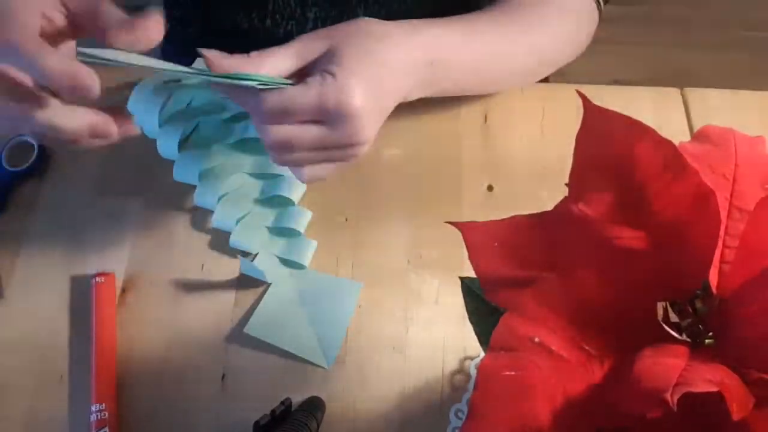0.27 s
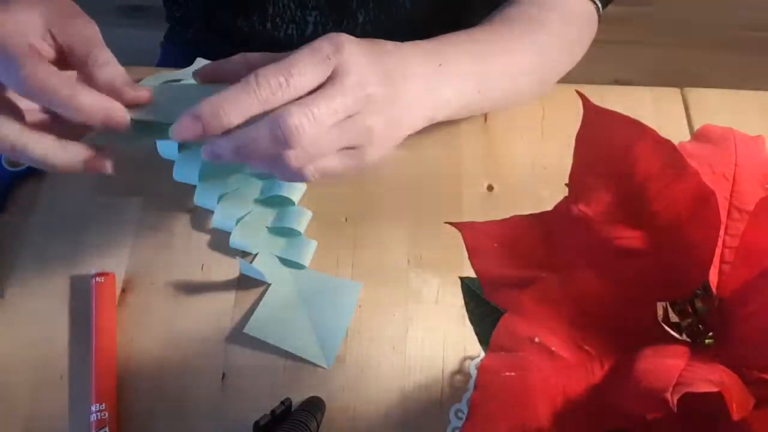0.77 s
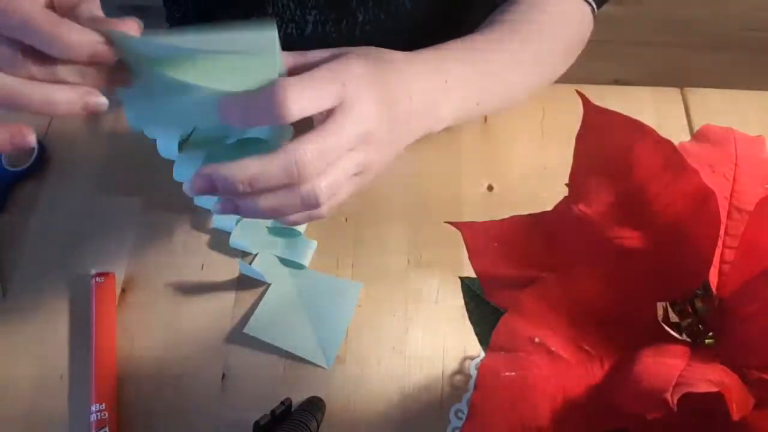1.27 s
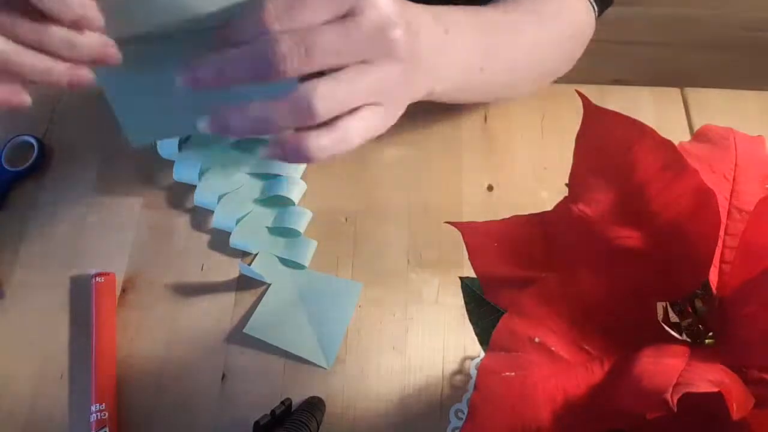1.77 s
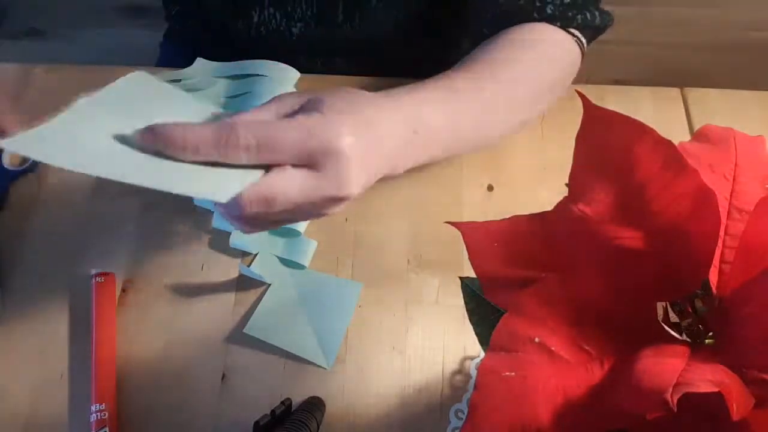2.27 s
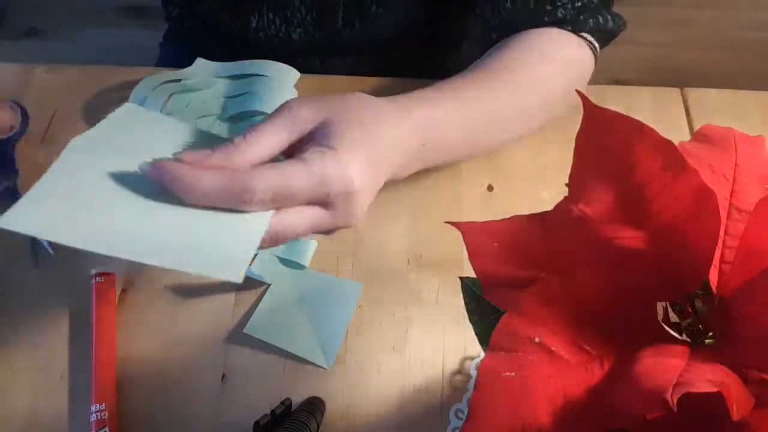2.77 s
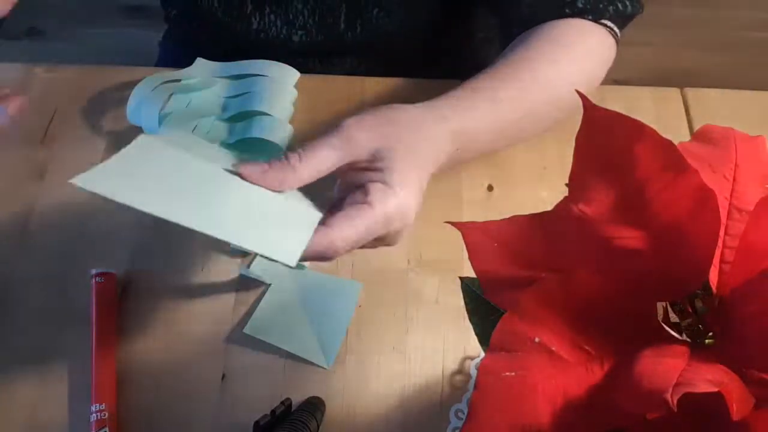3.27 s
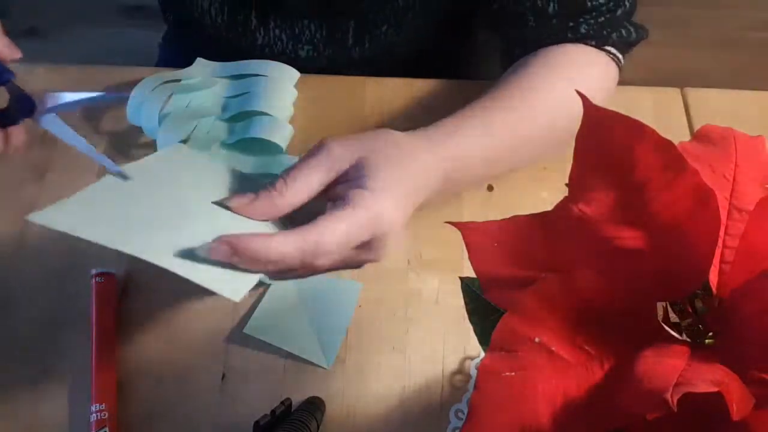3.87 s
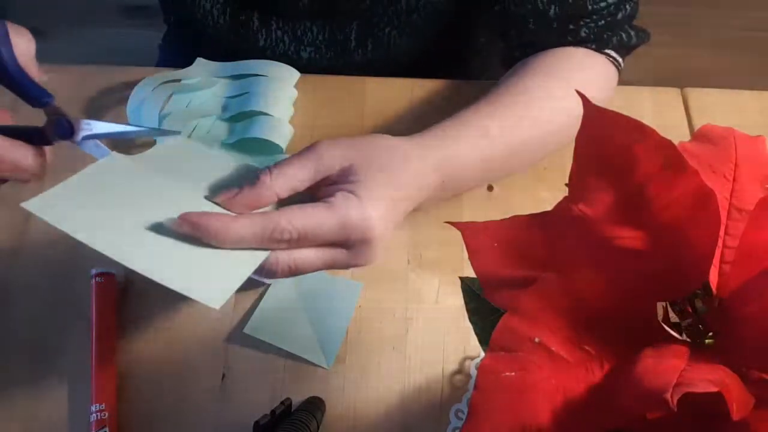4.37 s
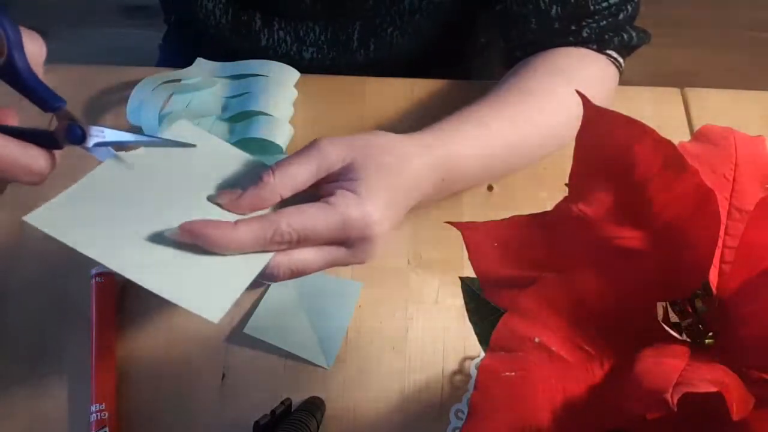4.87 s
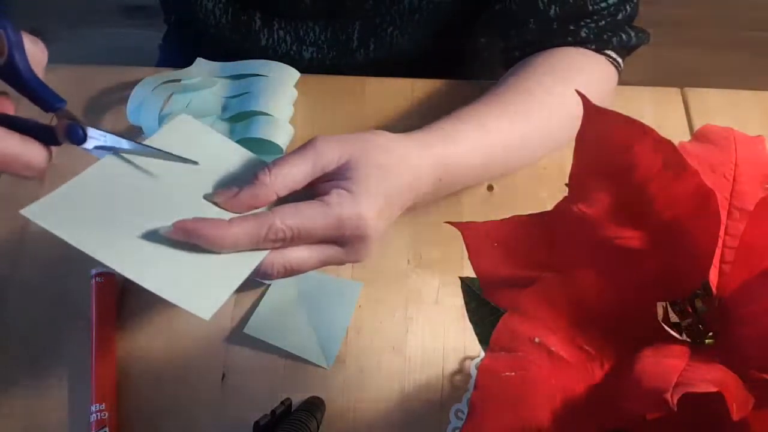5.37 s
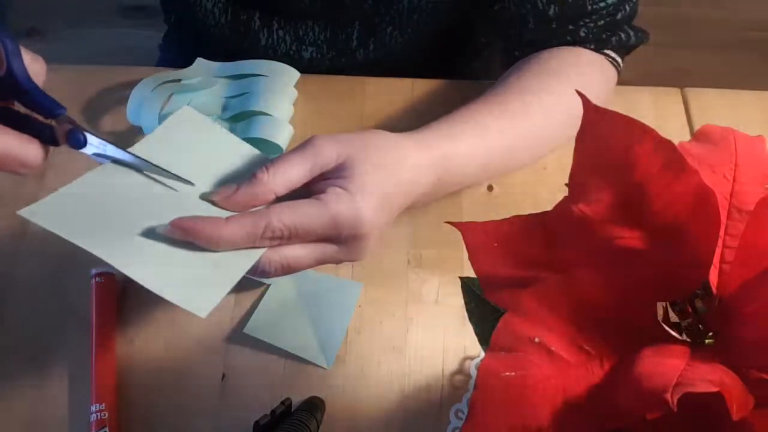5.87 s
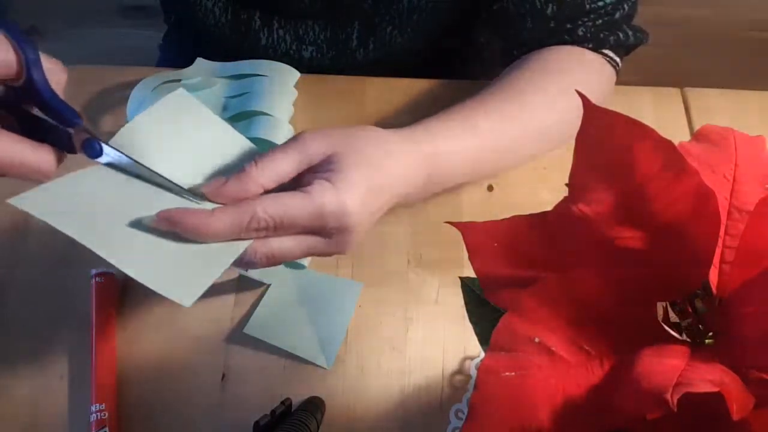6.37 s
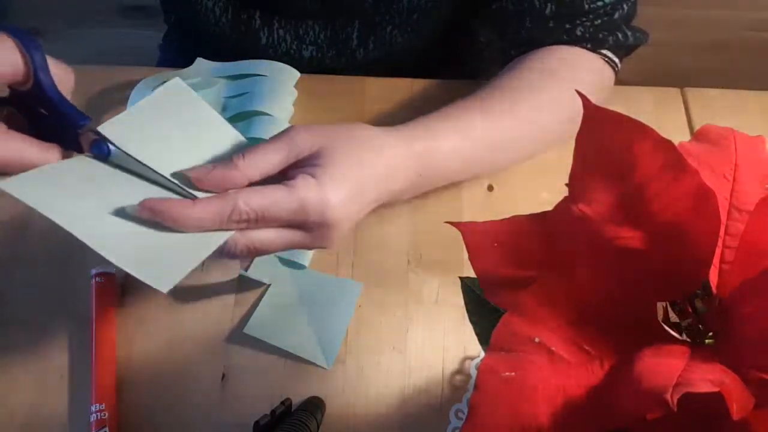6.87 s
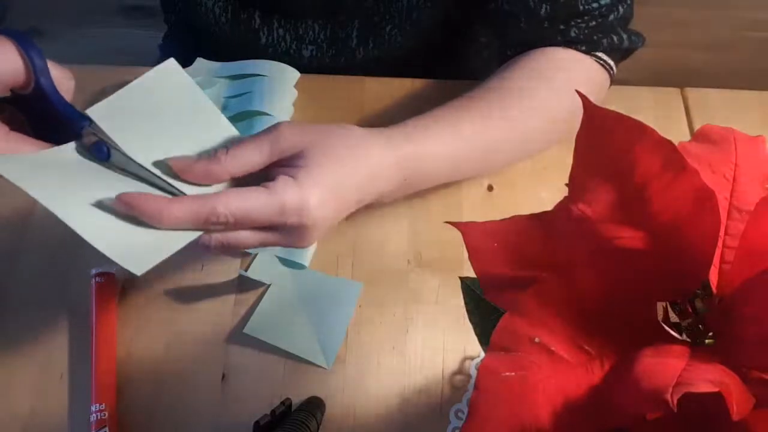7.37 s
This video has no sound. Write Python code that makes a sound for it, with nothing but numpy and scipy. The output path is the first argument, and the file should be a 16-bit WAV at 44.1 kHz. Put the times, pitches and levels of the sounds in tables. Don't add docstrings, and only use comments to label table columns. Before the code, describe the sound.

A stiff sheet is handled near a stereo microphone: light rustles, sharp snaps, a short harsh crease, then a burst of crackling as it unfolds and turns. Dull taps touch the wooden table. Things thin out to small flicks and a very faint distant motor hum, before blades shear slowly, then crackle through the paper in louder, quicker bites. Short room reflections and soft hiss surround it.

```python
import sys
import numpy as np
from scipy import signal
from scipy.fft import rfft, irfft
from scipy.io import wavfile
from scipy.ndimage import uniform_filter1d

SR = 44100
rng = np.random.default_rng(int(sys.argv[2]) if len(sys.argv) > 2 else 0)


def ratio_of_db(decibels):
    return 10 ** (np.asarray(decibels, float) / 20)


def store_pcm(level_fs):
    pcm = np.round(np.clip(level_fs, -1, 1) * 32767).astype(np.int16)
    wavfile.write(sys.argv[1], SR, np.atleast_2d(pcm).T)


N = 335160
T = np.arange(N) / SR


def unit(x):
    return x / np.sqrt(np.mean(x ** 2))


def lowpass(x, hz):
    return signal.sosfilt(signal.butter(2, hz, fs=SR, output="sos"), x)


def band(x, lo_hz, hi_hz):
    sos = signal.butter(2, (lo_hz, min(hi_hz, 0.45 * SR)), "bandpass", fs=SR, output="sos")
    return signal.sosfilt(sos, x)


def on_log(table, hz):
    table_hz, value = np.transpose(table)
    return np.interp(np.log(hz + 1), np.log(table_hz), value)


def walk(rate):
    k = int(SR / rate)
    levels = np.repeat(rng.standard_normal(N // k + 1), k)
    return unit(uniform_filter1d(uniform_filter1d(levels, k), k)[:N])


def decay(t, t60):
    return np.exp(-np.log(1000) * t / t60)


def sweep(hz):
    return 2 * np.pi * np.cumsum(hz) / SR


# pitch_hz, level_db [dB per Hz]
AIR = [(26, -61), (45, -2.5), (133, -9), (465, -19.5), (539, -18.5), (672, -20.5), (1800, -25.5),
       (2130, -27), (2530, -24), (7650, -37.5), (16000, -26.5)]
# pitch_hz, likeness [0-1]
AIR_ALIKE = [(60, 0.56), (300, 0.61), (2000, 0.1), (8000, 0.033)]


def air():
    hz = np.fft.rfftfreq(N, 1 / SR)
    alike = on_log(AIR_ALIKE, hz)
    rumble_cut = 1 + (40 / (hz + 1)) ** 3
    mid, side = rfft(rng.standard_normal((2, N))) * ratio_of_db(on_log(AIR, hz)) / rumble_cut
    mid = irfft(mid * np.sqrt(1 + alike), N)
    side = irfft(side * np.sqrt(1 - alike), N)
    return unit(np.array([mid + side, mid - side])) * ratio_of_db(-64.5 + 0.75 * walk(3.13))


def fibres(rate, scatter_db, stutter_db, channels=1):
    large = ratio_of_db(scatter_db * np.minimum(rng.exponential(size=(channels, N)), 4))
    slips = rng.random((channels, N)) < rate / SR
    return slips * rng.standard_normal((channels, N)) * large * ratio_of_db(stutter_db * walk(70))


# pitch_hz, level_db
BETWEEN = [(150, -14), (400, -13), (1150, -17), (4500, -11), (7500, -19), (8800, -27), (11000, -19),
           (13500, -17), (16000, -19)]


def sheet_response(modes, size=1024):
    hz = np.fft.rfftfreq(size, 1 / SR)
    power = ratio_of_db(on_log(BETWEEN, hz)) ** 2
    for mode_hz, width_hz, db in modes:
        power = power + ratio_of_db(db) ** 2 / (1 + (2 * (hz - mode_hz) / width_hz) ** 4)
    ceps = irfft(np.log(power) / 2)
    ceps[1:size // 2] *= 2
    ceps[size // 2 + 1:] = 0
    return irfft(np.exp(rfft(ceps)))


ALIKE = (0.99, 0.69, 0.56, 0.02)


def part(x, edges, k):
    alike = ALIKE[k]
    ports = np.array([x[0], alike * x[0] + np.sqrt(1 - alike ** 2) * x[1]])
    return (-1) ** k * band(ports, edges[k], edges[k + 1])


def steady(x):
    return x / np.sqrt(uniform_filter1d(np.mean(x ** 2, axis=0), int(0.08 * SR)))


def held_db(t, start_s, hold_s, db, swell_db_s, fade_db_s):
    early = np.maximum(start_s - t, 0)
    late = np.maximum(t - start_s - hold_s, 0)
    return db - swell_db_s * early - fade_db_s * late


def grip(strokes, rule, every=88):
    swell_db_s, fade_db_s, fizz_db, share = rule
    start_s, hold_s, db, depth_db, slack_db = np.transpose(strokes)[:, :, None]
    t = T[::every]
    held = ratio_of_db(held_db(t, start_s, hold_s, db, swell_db_s, fade_db_s)) ** 2
    colour = (depth_db + slack_db, depth_db, 0 * depth_db, fizz_db + share * depth_db)
    return np.array([np.interp(T, t, ratio_of_db(c - 5.0)[:, 0] ** 2 @ held) for c in colour])


def rubbing(power, modes, edges):
    slips = fibres(5500, scatter_db=1.7, stutter_db=2.8, channels=2)
    rung = signal.fftconvolve(slips, sheet_response([])[None])[:, :N]
    for k, (hz, width_hz, db) in enumerate(modes):
        bending = ratio_of_db(db + 2.2 * walk(10))
        rung = rung + (-1) ** k * band(slips, hz - width_hz / 2, hz + width_hz / 2) * bending
    return sum(steady(part(rung, edges, k)) * np.sqrt(p) for k, p in enumerate(power))


# pitch_hz, width_hz, level_db
SHEET = [(288, 420, -6.5), (666, 230, -5.5), (933, 120, -10.5), (1503, 630, -6), (2500, 760, -10.5),
         (3244, 570, -4), (4370, 1240, 0), (5620, 680, -2), (5900, 1130, -11), (7350, 1130, -11.5)]
LOOSE_EDGES = (150, 1150, 2600, 7800, 16000)
# start_s (full grip), hold_s, rustle_db, depth_db, slack_db
DRAGS = [(0.001, 0.051, -62, 3.5, -13), (.285, 0.027, -54, -6, 1), (.39, 0.022, -61.5, -26, -3),
         (.535, .01, -64, -27, 2), (.73, 0.054, -60.5, -10.5, -2), (.87, 0.008, -52.5, -24, 3),
         (1.1, 0.068, -31.5, -13, -27.5), (1.22, 0.025, -31.5, -13, -27), (1.33, 0.076, -42.5, -14, -30),
         (1.78, 0.045, -44, -10, -2.5), (1.97, 0.034, -52, -11, -13), (2.32, 0.063, -49.5, 4.5, -4),
         (2.65, 0.022, -65.5, 14, 7), (2.85, 0.08, -57, -3.5, -4.5), (3.0, 0.04, -55.5, -3.5, -6),
         (3.27, 0.0097, -55.5, -11.5, 0), (3.47, 0.005, -52, -0.5, -10), (3.64, 0.028, -65.5, -14, 0),
         (3.76, 0.026, -77.5, 7, 4)]
# start_s, hold_s, rustle_db, depth_db, slack_db
FLICKS = [(.992, 0.05, -42.5, 2.5, -32), (1.422, 0.013, -43, -2, -11), (1.48, 0.013, -47.5, 7.5, -12),
          (1.525, 0.082, -54, -0.5, 1), (1.607, 0.01, -33, -7, -8.5), (1.814, 0.037, -50, 13, -6.5),
          (2.197, 0.054, -55.5, 1, 8.5), (2.257, 0.038, -46, -9, -4.5), (2.405, 0.04, -63.5, 20.5, 4),
          (2.53, 0.038, -64, 9.5, 10), (2.648, 0.055, -50, 2, -13), (2.765, 0.041, -53, -1, 3),
          (3.336, 0.035, -56, 15, -8.5), (3.5, 0.066, -60.5, 1.5, -6)]
# swell_db_s, fade_db_s, fizz_db (re rustle), share of depth that the fizz follows
DRAG_GRIP = (208.5, 200, -6, 0)
FLICK_GRIP = (2199.5, 163.5, -9, 0.7)


def handling():
    power = grip(DRAGS, DRAG_GRIP) + grip(FLICKS, FLICK_GRIP)
    return rubbing(power, SHEET, LOOSE_EDGES)


# start_s, hold_s, level_db, pitch_hz
HOLLOWS = [(0.065, 0.13, -70, 886), (1.62, 0.011, -49, 576), (2.0, 0.018, -62.5, 1050),
           (2.623, 0.044, -49, 707), (3.049, 0.018, -63, 360), (6.9, 0.095, -62, 230),
           (3.9, 0.033, -59, 270), (7.27, 0.038, -57, 176), (6.209, 0.031, -45.5, 1470),
           (6.83, 0.022, -46, 1660), (1.861, 0.016, -41.5, 1120), (4.36, 0.086, -59, 2610),
           (4.27, .12, -62.5, 1400), (1.615, .02, -38, 4250), (2.655, .03, -52, 2880),
           (.53, .015, -61.5, 5500), (4.67, 0.12, -63.5, 2600), (6.24, 0.0047, -45.5, 1670),
           (6.812, 0.021, -43, 4600), (6.857, 0.0098, -42, 1450), (7.214, 0.054, -48.5, 470),
           (6.8, 0.057, -61, 243), (6.459, 0.04, -63, 740), (6.535, 0.044, -51.5, 750),
           (7.031, 0.048, -46.5, 920)]


def hollows():
    slips, out = fibres(6000, scatter_db=1.2, stutter_db=2.2)[0], np.zeros(N)
    half_width = 0.5 / 6.3
    for s, hold_s, db, hz in HOLLOWS:
        near = slice(max(int((s - 0.15) * SR), 0), int((s + 0.4) * SR))
        song = unit(band(slips[near], hz * (1 - half_width), hz * (1 + half_width)))
        out[near] += song * ratio_of_db(held_db(T[near], s, hold_s, db, swell_db_s=599, fade_db_s=315))
    return out


def pops(events, t60, fizz_db, modes, edges, size=3072):
    out, t = np.zeros((2, N + size)), np.arange(size) / SR
    build = (1 - np.exp(-t / (0.038 * t60))) ** 2
    longer = (2.04, 0.92, 0.33, 0.48)
    for s, crack_db, depth_db, slack_db in events:
        shake = rng.standard_normal((2, size))
        favoured = np.array(modes)
        favoured[:, 2] += 2.5 * rng.standard_normal(len(modes))
        ring = sheet_response(favoured)[None]
        sheet_db = crack_db + depth_db
        peaks_db = (sheet_db + slack_db + 2.5, sheet_db + 3.5, crack_db - 0.8, crack_db + fizz_db + 7.5)
        start = int(s * SR)
        for k, db in enumerate(peaks_db):
            push = shake * build * decay(t, t60 * longer[k])
            rattle = part(signal.fftconvolve(push, ring)[:, :size], edges, k)
            out[:, start:start + size] += ratio_of_db(db) * rattle / np.abs(rattle).max()
    return out[:, :N]


# start_s, crack_db (peak), depth_db, slack_db
OPENING = [(0.3194, -29, -31.5, 11.5), (0.388, -42, -30, 12), (0.537, -43, -41, 4), (0.5918, -48, -22, 5),
           (0.7224, -44.5, -8.5, -14), (0.7855, -47, -16, -7.5), (0.86, -45, -21, 0),
           (0.9227, -63.5, 2.5, 8.5), (0.943, -38.5, -13, -8), (0.9797, -25, -29, -28.5),
           (0.9881, -23.5, -39, -18), (0.9948, -18, -16.5, -42), (1.0273, -25.5, -9.5, -45),
           (1.4255, -28.5, -31, 4), (1.431, -21, -37, -5), (1.48, -27, -18, -7), (1.5237, -22.5, -7, -14.5),
           (1.5496, -24, -13, -16.5), (1.5765, -26.5, -7.5, -24), (1.6115, -25.5, -7.5, -19),
           (1.6283, -22, -15.5, -9.5)]


def opening():
    return pops(OPENING, 0.035, -15, SHEET, LOOSE_EDGES)


# start_s, level_db (peak), pitch_hz, t60_s
THUMPS = [(0.802, -56, 262, .11), (1.192, -50, 190, .12), (1.848, -33, 170, .045), (2.41, -39, 262, .15),
          (1.842, -24, 1010, .066), (2.337, -27, 1400, .054), (2.404, -30, 1305, .055),
          (3.902, -31.5, 1500, .045), (2.299, -28, 510, .035), (2.365, -38, 680, .06),
          (2.462, -40, 320, .07), (3.498, -45, 600, .05), (2.533, -42, 326, .09), (2.54, -46, 226, .2),
          (5.787, -55, 264, .21), (1.526, -32, 2700, .03), (6.648, -30, 1460, .035),
          (7.042, -35, 902, .035), (7.059, -33, 1560, .035), (7.266, -27, 1550, .04)]
# start_s, level_db (peak), pitch_hz, t60_s
THUDS = [
    (1.208, -58, 108, .21),
    (1.812, -43, 74, .3),
    (2.599, -55, 109, .2),
    (7.059, -49, 45, .14),
]


def thumps():
    out = np.zeros(N)
    for s, db, hz, t60 in THUMPS + THUDS:
        near = slice(int(s * SR) + 1, int(s * SR) + SR // 2)
        t = T[near] - s
        soft_start = 1 - np.exp(-t / 0.0014)
        out[near] += ratio_of_db(db) * np.sin(2 * np.pi * hz * t) * soft_start * decay(t, t60)
    return out


# start_s, level_db, pitch_hz
CREASE = [
    (1.06, -55, 4300),
    (1.105, -18, 4300),
    (1.125, -20, 4250),
    (1.136, -36.5, 4100),
    (1.146, -16.5, 3950),
    (1.165, -24, 4000),
    (1.2, -32, 4300),
    (1.26, -30.5, 4750),
    (1.36, -52.5, 4400),
]
# start_s, level_db, pitch_hz
CREASE_BEHIND = [
    (1.05, -54, 3400),
    (1.085, -28, 3350),
    (1.125, -27, 3313),
    (1.14, -34.5, 3280),
    (1.2, -23.5, 3200),
    (1.225, -31, 3000),
    (1.27, -28.5, 2960),
    (1.3, -38, 3010),
    (1.36, -56.5, 2978),
]


def crease(curve):
    s, db, hz = np.transpose(curve)
    spread = lowpass(fibres(7000, scatter_db=0.74, stutter_db=1.2), 380)
    spread = spread / uniform_filter1d(spread ** 2, size=300) ** 0.35
    level = ratio_of_db(np.interp(T, s, db - 6.0, -120, -120))
    return unit(spread) * np.cos(sweep(np.interp(T, s, hz))) * level


# start_s, hold_s, fizz_db
GLIDES = [(1.063, 0.033, -38), (1.215, 0.052, -37), (1.776, .04, -49), (1.809, 0.013, -43),
          (1.9, 0.043, -52.5), (3.172, .015, -59.5), (3.258, 0.046, -61), (4.387, 0.022, -65.5),
          (2.655, 0.026, -56), (3.857, 0.039, -51), (4.182, .02, -59.5), (4.286, 0.032, -71),
          (4.501, 0.03, -52.5), (5.451, 0.59, -67.5), (6.178, 0.045, -42), (7.212, 0.018, -42.5),
          (7.422, .03, -41)]
# swell_db_s, fade_db_s, fizz_db (re rustle), share of depth that the fizz follows
GLIDE_GRIP = (699, 243, 17, 0)


def glides():
    strokes = [(s, hold_s, db - GLIDE_GRIP[2], -30, 0) for s, hold_s, db in GLIDES]
    return grip(strokes, GLIDE_GRIP)


# start_s, crack_db (peak), depth_db, slack_db
TURNING = [(1.8151, -18, -4, -6.5), (1.8432, -31, 5.5, -6), (1.8525, -40, 5.5, -2), (1.866, -43, -3, -13),
           (1.8753, -31, 6, -8), (1.883, -41.5, 0, -14), (1.9, -45.5, 0, -12), (2.1962, -49, -15, 17.5),
           (2.221, -47.5, 3.5, 4), (2.259, -36.5, 3.5, -5.5), (2.2815, -39.5, 5.5, -4),
           (2.2995, -34.5, 5, -3), (2.3325, -34, 11.5, -13), (2.3375, -29, 10, -17),
           (2.348, -39.5, 11.5, -9), (2.378, -41, -4, 2), (2.4035, -47.5, 22.5, -3), (2.5263, -52, 8, 7),
           (2.6434, -59, 12, 0), (2.765, -48.5, -2, 0), (2.7973, -38, -23, 7), (3.3353, -30.5, 9, -20),
           (3.3525, -45, 15.5, -6), (3.466, -37.5, -2, -30), (3.498, -60, 18, -1.5),
           (3.5206, -47.5, 1, -13), (3.5522, -49.5, 9, -10)]


def turning():
    return pops(TURNING, 0.032, -19, SHEET, LOOSE_EDGES)


# start_s, pitch_hz, level_db
HUM = [
    (3.4, 125, -84),
    (3.6, 126.7, -74.5),
    (3.9, 128.5, -83.5),
    (4.55, 129, -83),
    (4.68, 132.2, -69.5),
    (4.9, 126.2, -76.5),
    (5.2, 127, -83.5),
]


def hum():
    s, hz, db = np.transpose(HUM)
    level = ratio_of_db(np.interp(T, s, db, -120, -120) + 10.5 + 2.1 * walk(21))
    return level * np.sin(sweep(np.interp(T, s, hz)))


# pitch_hz, width_hz, level_db
PINCHED = [(514, 203, -16.5), (859, 175, -8.5), (1406, 226, -7.5), (1818, 360, -4.5), (2600, 600, -7),
           (4040, 630, -2.5), (4295, 260, -10.5), (5090, 710, -2), (6070, 740, -15), (7320, 550, -11)]
PINCHED_EDGES = (360, 1150, 3200, 7800, 16000)
# start_s, hold_s, rustle_db, depth_db, slack_db
SNIPS = [(3.855, 0.035, -44, -4.5, -10), (3.9, 0.0037, -55.5, 16.5, -2), (4.19, 0.06, -58.5, -10.5, 9.5),
         (4.5, 0.035, -55.5, -1, -6), (4.605, 0.017, -53.5, -4.5, -3.5), (4.665, 0.037, -53.5, 1.5, -10),
         (5.29, 0.22, -64.5, -5.5, -5), (5.87, 0.044, -54.5, -24, -12), (6.12, 0.028, -43, 2.5, -8),
         (6.455, 0.012, -49, -18, 5), (6.755, 0.069, -38, -7, -28), (6.962, 0.044, -42, -18, 7.5),
         (7.202, 0.062, -32.5, -3, -3.5), (7.413, 0.044, -32, -6.5, -8)]
# start_s (full grip), hold_s, rustle_db, depth_db, slack_db
SHEARS = [(4.28, .13, -46.5, -3.5, -11.5), (4.78, 0.015, -55, 3, -12), (5.49, 0.091, -56.5, -13, 2),
          (5.65, 0.13, -61, -11, 2), (6.0, 0.018, -38, -6, -1), (6.19, 0.054, -38, 0.5, -17),
          (6.38, 0.086, -58, -8, -15), (6.575, 0.045, -37.5, -13, 2), (6.82, 0.019, -38, 1, -15),
          (7.05, 0.048, -44.5, -7.5, 4.5), (7.265, 0.036, -38, -13, 2), (7.34, 0.0062, -46, -1.5, -3),
          (7.45, 0.084, -42.5, -9, 0.5)]
# swell_db_s, fade_db_s, fizz_db (re rustle), share of depth that the fizz follows
SNIP_GRIP = (3500, 256, -13.5, -0.1)
SHEAR_GRIP = (202, 290, -11, 0.25)
# start_s, crack_db (peak), depth_db, slack_db
BITES = [(3.8989, -28, 0.5, -9), (4.5073, -52, 2.5, -20), (4.5282, -51.5, 5, -24), (4.603, -46.5, -6, -13),
         (4.6663, -50.5, -15.5, 3.5), (5.8242, -45, -6.5, -25), (5.874, -38, -16, -5),
         (5.891, -38, -11, -27), (5.928, -51, -11, -10), (5.951, -38, -12, -4), (5.97, -41, 1, -12),
         (5.9997, -38.5, 0, -5), (6.031, -39, -30, -6), (6.0829, -42, 2, -5), (6.126, -42, 4, -8),
         (6.239, -37.5, 4, -18), (6.436, -44.5, -11, -8), (6.4592, -40.5, -17, 3), (6.519, -43, -18, 2),
         (6.5495, -25.5, -19.5, 4), (6.572, -26.5, -12, 3.5), (6.583, -27.5, -5, -12),
         (6.5964, -16.5, -6, -9.5), (6.616, -19, 1, -17), (6.632, -27, -6.5, -6), (6.6467, -26.5, 1.5, -8),
         (6.783, -28, -14, -18), (6.8553, -29, -4, -5), (6.961, -35.5, -14, 2), (6.9734, -29.5, -23, 12.5),
         (6.991, -32.5, -9, -1), (7.011, -41, -12, -10), (7.022, -36.5, -4, -2), (7.0407, -27.5, -11, 0.5),
         (7.0603, -34, -5, -0.5), (7.0768, -27.5, -7, -12), (7.0924, -32.5, -10, -12),
         (7.1091, -28.5, -12, -2), (7.262, -25.5, -4.5, -10), (7.2673, -19, -2.5, -11.5),
         (7.336, -40.5, 1.5, -9), (7.398, -45, 3, -14), (7.4661, -21.5, -23.5, 6),
         (7.5103, -24.5, -29.5, 14.5)]


def cutting():
    power = grip(SNIPS, SNIP_GRIP) + grip(SHEARS, SHEAR_GRIP) + glides()
    return rubbing(power, PINCHED, PINCHED_EDGES) + pops(BITES, 0.039, -17, PINCHED, PINCHED_EDGES)


# pitch_hz, width_hz, share removed [0-1]
TABLE_DIPS = [(1162, 128, 0.44), (2110, 200, 0.28), (3350, 130, 0.15)]


def mirrored(x):
    for hz, width_hz, share in TABLE_DIPS:
        x = x - share * signal.lfilter(*signal.iirpeak(hz, hz / width_hz, fs=SR), x)
    return x


# start_s, level_db (left minus right)
PAN = [
    (0.0, -0.5),
    (4.09, 4),
    (7.6, 2),
]


def two_ports(paper, knocks):
    left, right = paper + knocks
    left = np.roll(left + ratio_of_db(-8.5) * band(left, 10620, 16000), 2)
    pan_db = np.interp(T, *np.transpose(PAN))
    return np.array([left * ratio_of_db(pan_db / 2), right * ratio_of_db(-pan_db / 2)])


# low_hz, high_hz, t60_s, level_db
ROOM = [(144, 840, 0.13, -6), (660, 3000, 0.19, -5.5), (2130, 4800, 0.32, -13), (7100, 17300, 0.12, -2.5)]


def room_response(size=22050):
    t = np.arange(size) / SR
    tail = 0
    for lo_hz, hi_hz, t60, db in ROOM:
        noise = band(rng.standard_normal((2, size)), lo_hz, hi_hz)
        echo = noise * decay(t, t60) * (1 - np.exp(-t / 0.00079))
        energy = np.sum(echo ** 2) / 2 * SR / 2 / (hi_hz - lo_hz)
        tail = tail + ratio_of_db(db) * echo / np.sqrt(energy)
    return tail


def scene():
    folding = handling() + opening() + crease(CREASE) + crease(CREASE_BEHIND) + turning()
    paper = mirrored(folding + cutting())
    knocks = thumps() + hollows()
    direct = two_ports(paper, knocks)
    room = signal.fftconvolve((paper + knocks)[:1], room_response())[:, :N]
    return direct + room + air() + hum()


def band_limit(x):
    return signal.sosfilt(signal.butter(12, 16150, fs=SR, output="sos"), x)


def record(dry):
    mix = signal.sosfilt(signal.ellip(8, 0.2, 70, 15950, fs=SR, output="sos"), dry)
    return band_limit(mix)


dry = scene()
out = record(dry)
store_pcm(out)
```